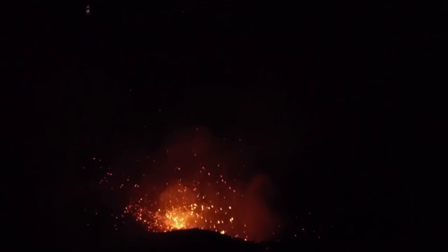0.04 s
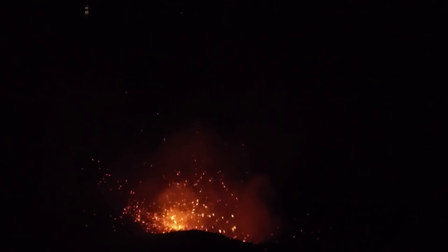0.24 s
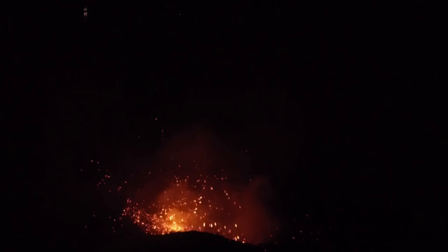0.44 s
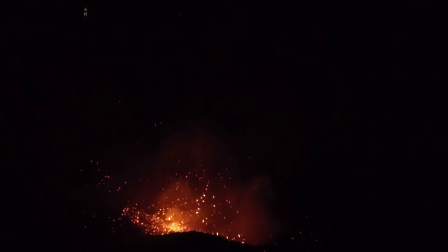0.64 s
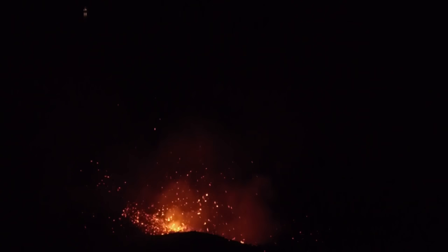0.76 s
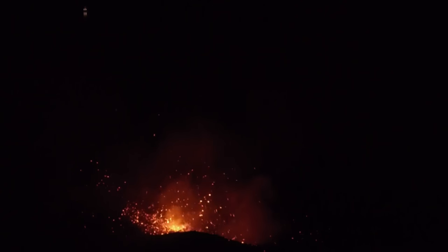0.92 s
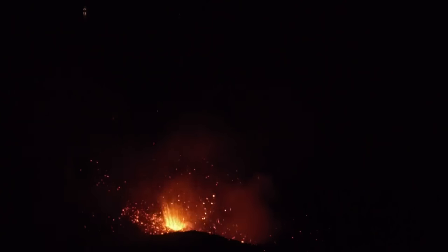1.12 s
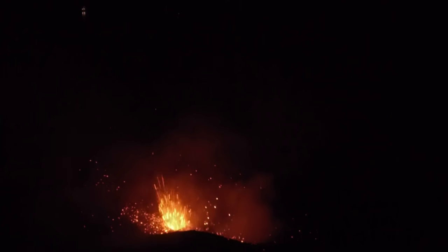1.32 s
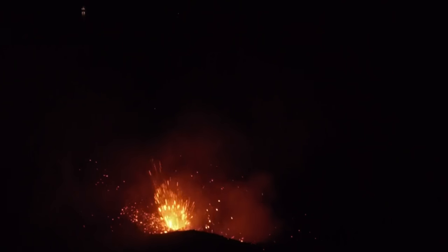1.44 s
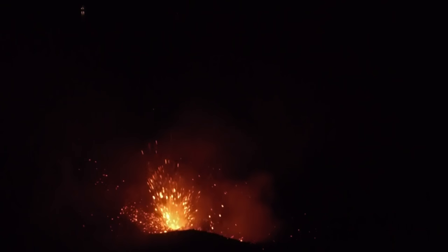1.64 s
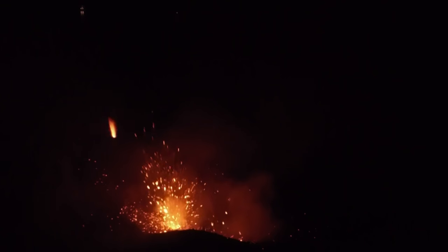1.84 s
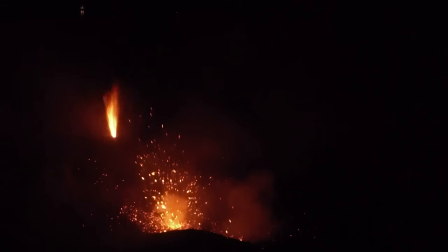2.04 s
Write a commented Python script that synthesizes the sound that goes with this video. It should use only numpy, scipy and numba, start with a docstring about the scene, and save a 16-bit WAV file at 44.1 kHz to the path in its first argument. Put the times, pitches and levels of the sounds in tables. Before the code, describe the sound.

Heavy wind thuds and flutters on the microphone, with sharp cracks, small ticks and faint hiss

```python
"""A thudding wind rumble comes first: gusts buffet two microphone ports, the left one hardest, at night on a
windy slope facing an erupting vent. Turbulence is a swarm of pressure wavelets with listed buffets and cracks.
Under it lie a far hiss and swishes (shaped noise), a bat's calls (falling sweeps), a short squeak (a husky tone)
and ticks (struck resonances). A limiter holds the buffets back."""
import sys
import numpy as np
from scipy import signal
from scipy.fft import rfft, irfft
from scipy.io import wavfile
from scipy.ndimage import uniform_filter1d, minimum_filter1d
from numba import njit

SR = 44100
rng = np.random.default_rng(int(sys.argv[2]) if len(sys.argv) > 2 else 0)


def natural_amplitude(level_db):
    """Convert a level in decibels to a linear amplitude factor, elementwise."""
    exponent = np.asarray(level_db, float) / 20
    return 10 ** exponent


def file_out(sig):
    """Save sig as 16-bit WAV at sys.argv[1]."""
    # one column per channel
    cols = np.atleast_2d(sig).T
    # limit, then scale
    lim = np.clip(cols, -1, 1)
    pcm = np.round(lim * 32767).astype(np.int16)
    wavfile.write(sys.argv[1], SR, pcm)


N = 91507
T = np.arange(N) / SR


def band(x, lo_hz, hi_hz, order=2):
    """Band-pass filtering: a Butterworth response, maximally flat within the band."""
    sos = signal.butter(order, [lo_hz, min(hi_hz, .45 * SR)], "band", fs=SR, output="sos")
    return signal.sosfilt(sos, x)


def unit(x):
    """Normalisation: scale to rms 1."""
    return x / np.sqrt(np.mean(x ** 2))


def panned(x, pan_db):
    """Intensity panning: a left-minus-right level difference places the sound."""
    return x * natural_amplitude(np.array([[pan_db], [-pan_db]]) / 2)


# spectrum of the far hiss: (frequency [Hz], relative spectral density [dB])
HISS_SPECTRUM = [(500, -22.5), (1000, -6.5), (1700, -7.5), (2500, -15), (3200, -13.5), (4800, -14.5),
                 (5600, -20), (7000, -18.5), (8300, -22.5), (10000, -19.5), (12500, -27.5), (15800, -29.5)]
# level of the hiss, ducked by the recorder's gain after loud hits: (time [s], rms level before flicker [dB])
HISS_LEVEL = [(0, -59.5), (.2, -63.5), (.45, -60), (.8, -58.5), (1.0, -66.5), (1.35, -61), (1.7, -65),
              (1.92, -69), (2.07, -65)]
HISS_WIDTH, HISS_PAN_DB, HISS_FLICKER_DB = 0.65, 1, 1.2


def hiss():
    """Spectral shaping: white noise weighted by a smooth spectrum follows a listed level and flickers a little."""
    hz, db = np.array(HISS_SPECTRUM).T
    f = np.arange(N // 2 + 1) * SR / N + 1
    weight = natural_amplitude(np.interp(np.log(f), np.log(hz), db))
    mid, side = irfft(rfft(rng.standard_normal((2, N))) * weight, N)
    steps = np.repeat(rng.standard_normal(N // 3000 + 1), 3000)
    flicker = uniform_filter1d(steps, 3000)[:N]
    level_db = np.interp(T, *np.array(HISS_LEVEL).T) + HISS_FLICKER_DB * flicker
    scale = natural_amplitude(level_db) / np.std(mid)
    stereo = np.array([mid + HISS_WIDTH * side, mid - HISS_WIDTH * side])
    return panned(stereo * scale, HISS_PAN_DB)


# swishes, perhaps cloth: (start [s], rise [s], fall [s], noise rms before its envelope [dB],
# low edge [Hz], high edge [Hz])
SWISH_EVENTS = [(-.06, 0.025, 0.32, -56, 1400, 3940), (.52, 0.085, 0.14, -67.5, 4500, 5200),
                (0.884, 0.019, 0.19, -61.5, 3000, 9650), (1.699, 0.14, 0.057, -46.5, 1200, 3260),
                (1.914, 0.0051, 0.024, -46.5, 900, 2540)]
SWISH_WIDTH = 0.5


def swishes():
    """Amplitude modulation: bands of noise rise and die under a squared-sine envelope."""
    out = 0
    for at, rise, fall, db, lo_hz, hi_hz in SWISH_EVENTS:
        ramp = np.interp(T, [at, at + rise, at + rise + fall], [0, 1, 0])
        shape = np.sin(np.pi / 2 * ramp) ** 2
        mid, side = unit(band(rng.standard_normal((2, N)), lo_hz, hi_hz, order=3))
        stereo = np.array([mid + SWISH_WIDTH * side, mid - SWISH_WIDTH * side])
        out = out + natural_amplitude(db) * shape * stereo
    return out


# bat calls: (start [s], peak level before panning [dB])
BAT_CALLS = [(0.376, -61.5), (0.868, -62.5), (1.35, -58), (1.823, -64.5)]
BAT_TOP_HZ, BAT_FLOOR_HZ = 11900, 9240
BAT_SWEEP_S, BAT_CALL_S = 0.0071, .017  # time constant of the sweep, length of a call


def bat():
    """Frequency modulation: a pure tone sweeps down exponentially and flattens towards a floor."""
    out = 0
    for at, db in BAT_CALLS:
        u = np.clip(T - at, 0, BAT_CALL_S)
        hz = BAT_FLOOR_HZ + (BAT_TOP_HZ - BAT_FLOOR_HZ) * np.exp(-u / BAT_SWEEP_S)
        shape = np.sin(np.pi * u / BAT_CALL_S) ** .7  # zero outside the call
        out = out + natural_amplitude(db) * shape * np.sin(2 * np.pi * np.cumsum(hz) / SR)
    return panned(out, 1.5)


# a faint squeak on the right: (time [s], pitch [Hz], rms of the smooth tone before panning [dB])
SQUEAK_GLIDE = [(0.746, 1072, -62), (0.759, 1072, -55.5), (0.774, 1202, -53), (0.801, 1205, -56),
                (.815, 1167, -67)]
SQUEAK_PAN_DB, SQUEAK_HUSK = -11.5, .7


def squeak():
    """Random amplitude modulation: slow noise makes a thin tone husky as it rises, then dips slightly."""
    s, hz, db = np.array(SQUEAK_GLIDE).T
    phase = 2 * np.pi * np.cumsum(np.interp(T, s, hz)) / SR
    husk = 1 + SQUEAK_HUSK * unit(band(rng.standard_normal(N), 30, 130))
    level = natural_amplitude(np.interp(T, s, db, -150, -150))
    return panned(np.sqrt(2) * husk * np.sin(phase) * level, SQUEAK_PAN_DB)


# small dry ticks close by: (start [s], peak level before panning [dB], centre frequency [Hz],
# left-minus-right level [dB])
TICK_EVENTS = [(0.0668, -43, 12040, 10), (0.0855, -48.5, 9660, -16.5), (0.7178, -32.5, 1850, -6),
               (0.8973, -37.5, 4600, 12), (0.9008, -45.5, 6530, -5.5), (0.9095, -48, 5600, 0),
               (0.9303, -36.5, 4340, 9.5), (0.9417, -37.5, 4100, 20), (0.945, -47.5, 5370, 8.5),
               (0.9618, -40.5, 4940, 8.5), (0.967, -49.5, 5960, -7.5), (1.237, -36, 2010, -5)]
TICK_CLICK_DB, TICK_T60_S = 19, 0.0061
TICK_TAIL_DB, TICK_TAIL_T60_S = -4.5, 0.051
TICK_BAND_RATIO = 1.7  # band edges lie this factor below and above the centre


def ticks():
    """Impulse excitation: a sharp click and its scratchy tail ring a short broad resonance."""
    out = np.zeros((2, N))
    u = T[:2048]
    shape = natural_amplitude(-60 * u / TICK_T60_S) + natural_amplitude(TICK_TAIL_DB - 60 * u / TICK_TAIL_T60_S)
    for at, db, hz, pan_db in TICK_EVENTS:
        push = rng.standard_normal(len(u)) * shape + natural_amplitude(TICK_CLICK_DB) * (u == 0)
        snap = band(push, hz / TICK_BAND_RATIO, hz * TICK_BAND_RATIO)
        snap = snap / np.abs(snap).max() * natural_amplitude(db)
        i = int(at * SR)
        out[:, i:i + len(u)] += panned(snap, pan_db)
    return out


# sharp cracks in the wind noise, the two strongest from the microphone overloading, mostly on the left:
# (time [s], level before the last column and filtering [dB], half-width scale [s], signed factor [ratio])
OVERLOAD_CRACKS = [(0.1201, 13, 0.00037, 0.5), (0.9896, -4.5, 0.00024, 0.74), (1.872, 3, 0.00028, -1.1),
                   (1.9167, 17.5, .0007, -1)]
CRACK_RIGHT_DB, CRACK_POINT_DB, CRACK_REBOUND_HZ = -9, -22, 130


def cracks():
    """High-pass rebound: rounded spikes with a small sharp point swing back past zero."""
    spike = 0
    for at, db, width, way in OVERLOAD_CRACKS:
        u = np.abs(T - at) / width
        rounded = 1 / (1 + u ** 2) ** 2
        point = natural_amplitude(CRACK_POINT_DB) * np.exp(-u)
        spike = spike + way * natural_amplitude(db) * (rounded + point)
    spike = signal.sosfilt(signal.butter(2, CRACK_REBOUND_HZ, "high", fs=SR, output="sos"), spike)
    return spike * np.array([[1], [natural_amplitude(CRACK_RIGHT_DB)]])


@njit
def add_wavelets(out, port, at, hz, cycles, size, phase):
    """Superposition: bell-shaped pressure wavelets centred at the given times add at each port."""
    for k in range(len(at)):
        width = cycles[k] / hz[k] / 2
        first = max(int((at[k] - 3 * width) * SR), 0)
        last = min(int((at[k] + 3 * width) * SR), out.shape[1])
        for i in range(first, last):
            u = i / SR - at[k]
            bell = np.exp(-(u / width) ** 2)
            out[port[k], i] += size[k] * bell * np.cos(2 * np.pi * hz[k] * u + phase[k])


# every eddy sheds smaller, faster ones: (pitch multiple [ratio], level step [dB],
# weight of the edge level [ratio], wavelet length [cycles], time scatter [periods of the slow eddy])
EDDY_CASCADE = [(1.0, -0.36, 0, 1.213, 0), (1.8, -2, 0.21, 1.55, 2.5), (2.7, -0.5, 0.91, 1.76, 3.5),
                (4.0, -7.5, 0.85, 1.17, 3), (6.5, -20, 0.91, 0.81, 3.5)]


def eddies(port, at, hz, db, edge_db):
    """Turbulent cascade: each slow wavelet comes with quicker ones scattered around it."""
    out = np.zeros((2, N))
    chance = rng.random((len(at), 3 * len(EDDY_CASCADE)))
    for k, (multiple, step_db, weight, cycles, scatter) in enumerate(EDDY_CASCADE):
        phase, shift, detune = chance[:, 3 * k:3 * k + 3].T
        when = at + (shift - .5) * scatter / hz
        detune_oct = (k > 0) * .5 * (detune - .5)  # the slow eddy keeps its pitch
        pitch = hz * multiple * 2 ** detune_oct
        size = natural_amplitude(db + step_db + weight * edge_db)
        add_wavelets(out, port, when, pitch, np.full(len(at), cycles), size, 2 * np.pi * phase)
    return out


# strongest eddies hitting a port: (time [s], level before the cascade steps [dB], pitch [Hz],
# port [+1 left / -1 right], edge level, the share of fast eddies [dB])
STRONG_BUFFETS = [(0.0349, -23, 261.6, 1, 3), (0.0428, -10.5, 384, 1, -10.5), (0.0512, -4.5, 238.6, 1, -28),
                  (0.081, -5.5, 265, 1, -25), (0.089, -11, 360, 1, -20.5), (0.1022, -10.5, 259, 1, 0.5),
                  (0.121, 5.5, 236, 1, -22), (0.175, -5.5, 246, 1, -6), (0.2627, 4, 238.6, 1, -13),
                  (0.266, -3.5, 205.5, -1, -18), (0.2986, -5, 190, 1, -37.5), (0.3055, -6, 365, 1, -33.5),
                  (0.3338, -10.0, 204, 1, -8.5), (0.352, -11.5, 446, 1, -53.5), (0.414, -14, 226, 1, -16),
                  (0.4985, -4, 303, 1, -55), (0.5552, -11, 239, -1, -55), (0.7128, -8, 229, 1, -23),
                  (0.7188, -5, 240, 1, -46), (0.7246, 0, 290, 1, -24), (0.7576, -7.5, 174, 1, -57),
                  (0.789, -16.5, 182, 1, -13), (0.8235, -9, 219, 1, -47), (0.983, -6.5, 294, 1, -16.5),
                  (0.9917, -2.5, 276, 1, -8), (1.0049, 3, 230, 1, -20.5), (1.0191, 4, 480, 1, -26),
                  (1.0925, -5.5, 293, 1, -29), (1.101, 2.5, 207, -1, -14), (1.107, 0, 278, 1, -37),
                  (1.1421, -9.5, 201, -1, -11), (1.1676, -8, 273, 1, -32), (1.258, -10.5, 260, 1, -27.5),
                  (1.4377, -6.5, 172.5, 1, 1), (1.4756, -5, 247, 1, -42.5), (1.491, -2.5, 365, 1, -38.5),
                  (1.5277, -7.5, 259, 1, -27.5), (1.5902, -5.5, 295, 1, -46), (1.619, 6.5, 259, 1, -27),
                  (1.626, 5, 365, 1, -37), (1.6592, -2.5, 251, 1, -20.5), (1.671, -5.5, 239.5, 1, -15.5),
                  (1.693, -4.5, 356, 1, -26), (1.7273, 5, 399, 1, -32.5), (1.7359, -5, 506, 1, -46),
                  (1.747, -4, 286, 1, -12.5), (1.825, -25.5, 304, 1, -12.5), (1.875, -5, 167, 1, 2.5),
                  (1.9143, -9, 197.4, -1, 14.5), (1.9185, -14, 339, 1, -25), (1.9245, -4, 225.4, 1, -6.5),
                  (1.9409, -6.5, 359, 1, -32)]
# wind at the ports: (time [s], left level before scatter [dB], right level before scatter [dB],
# edge level before scatter [dB])
GUST_CURVE = [(0, -13, -38, -28), (0.138, -18.5, -28, -17.5), (0.189, -19, -35, -19.5),
              (0.221, -25.5, -38, -30), (0.298, -19.5, -20.5, -49.5), (0.369, -29, -53.5, -22.5),
              (0.496, -25, -25, -15), (0.6, -26, -44, -20.5), (0.67, -25.5, -34, -26.5),
              (0.77, -21.5, -31.5, -22.5), (0.861, -27.5, -36, -51), (0.95, -26, -32.5, -7),
              (1.047, -22, -30, -15), (1.179, -23, -33.5, -34), (1.298, -24.5, -30, -40),
              (1.379, -29.5, -51.5, -33), (1.458, -22.5, -36, -14), (1.559, -24, -32, -29),
              (1.66, -18.5, -26, -36.5), (1.771, -26, -43, 2), (1.85, -22, -39, -6),
              (1.958, -23, -36, -0.5), (2.07, -22.5, -44.5, -28)]
EDDIES_PER_S, EDDY_HZ, EDDY_SPREAD_OCT = 600, 213.4, 0.495
EDDY_SCATTER_DB, EDGE_SCATTER_DB = 1.5, 0.5
EDDY_OCT_PER_DB = 0.06  # stronger wind carries eddies past faster: pitch rises with the gust
WIND_CUT_HZ, SUB_DB = 96.7, -65.5
# each port leaks into the other channel: in phase below the split, inverted above
LEAK_LOW_DB, LEAK_HIGH_DB, LEAK_SPLIT_HZ = -11.5, -7.5, 480


def wind():
    """Turbulent pressure: buffets and cracks over a random swarm that follows gusts, separate at each port."""
    b, g = np.array(STRONG_BUFFETS, float), np.array(GUST_CURVE, float)
    ports = eddies((b[:, 3] < 0).astype(np.int64), b[:, 0], b[:, 2], b[:, 1], b[:, 4])
    ports += cracks()
    for port in range(2):
        chance = rng.random((2200, 4))
        at = np.cumsum(-np.log(chance[:, 0])) / EDDIES_PER_S  # Poisson arrivals
        gust_db = np.interp(at, g[:, 0], g[:, 1 + port])
        spread_oct = EDDY_SPREAD_OCT * np.log(chance[:, 1] / (1 - chance[:, 1])) / 2
        speed_oct = EDDY_OCT_PER_DB * (gust_db - g[:, 1 + port].mean())
        hz = np.clip(EDDY_HZ * 2 ** (spread_oct + speed_oct), 70, 500)
        db = gust_db - EDDY_SCATTER_DB * np.log(0.0033 + chance[:, 2])
        edge_db = np.interp(at, g[:, 0], g[:, 3]) + EDGE_SCATTER_DB * (2 * chance[:, 3] - 1)
        ports += eddies(np.full(len(at), port), at, hz, db, edge_db)
    ports = signal.sosfiltfilt(signal.butter(4, WIND_CUT_HZ, "high", fs=SR, output="sos"), ports)
    ports += natural_amplitude(SUB_DB) * unit(band(rng.standard_normal((2, N)), 20, 100))
    low = signal.sosfiltfilt(signal.butter(2, LEAK_SPLIT_HZ, fs=SR, output="sos"), ports)
    leak = natural_amplitude(LEAK_LOW_DB) * low - natural_amplitude(LEAK_HIGH_DB) * (ports - low)
    return ports + leak[::-1]


def scene():
    """Linear superposition: all the sources add at the two channels."""
    return hiss() + swishes() + bat() + squeak() + ticks() + wind()


def roll_off(x):
    """The treble ends steeply here."""
    return signal.sosfilt(signal.butter(12, 15830, fs=SR, output="sos"), x)


LIMIT_DB, LIMIT_RATIO, LIMIT_SMOOTH_S = -3.5, 3, .003
CLIP = 1.0  # full scale


def record(dry):
    """Dynamic compression: a quick limiter holds the buffets back; peaks still above full scale clip."""
    k = int(LIMIT_SMOOTH_S * SR) + 1
    loudest = -minimum_filter1d(-np.abs(dry).max(axis=0), size=2 * k)  # running maximum
    peak = uniform_filter1d(loudest, size=k)
    gain = np.minimum(natural_amplitude(LIMIT_DB) / (peak + 1e-9), 1) ** (1 - 1 / LIMIT_RATIO)
    mix = np.clip(dry * gain, -CLIP, CLIP)
    return roll_off(mix)


dry = scene()
out = record(dry)
file_out(out)
```